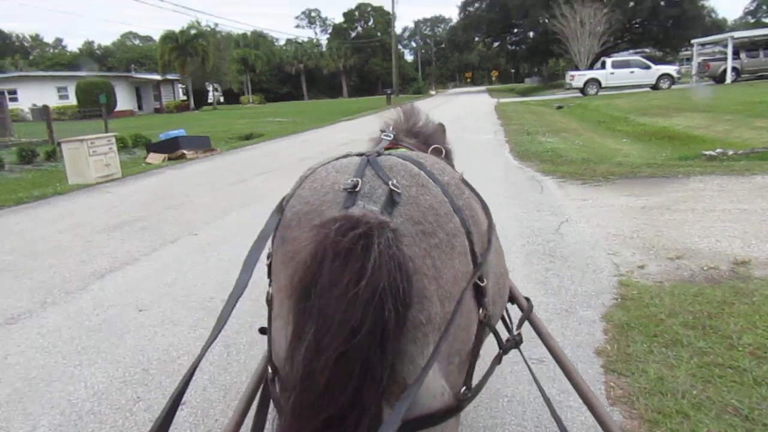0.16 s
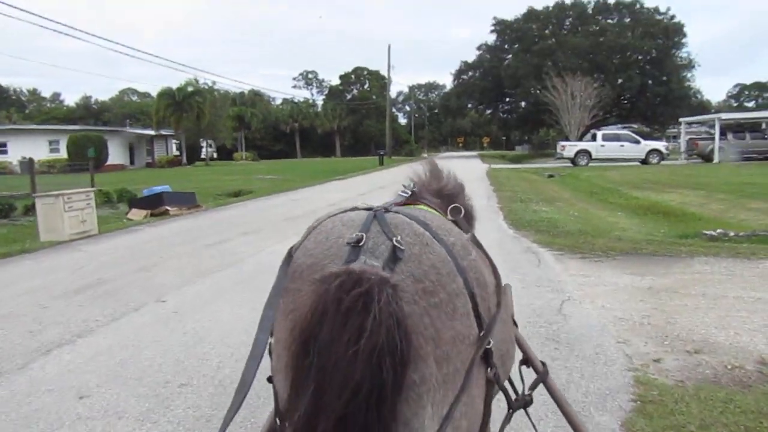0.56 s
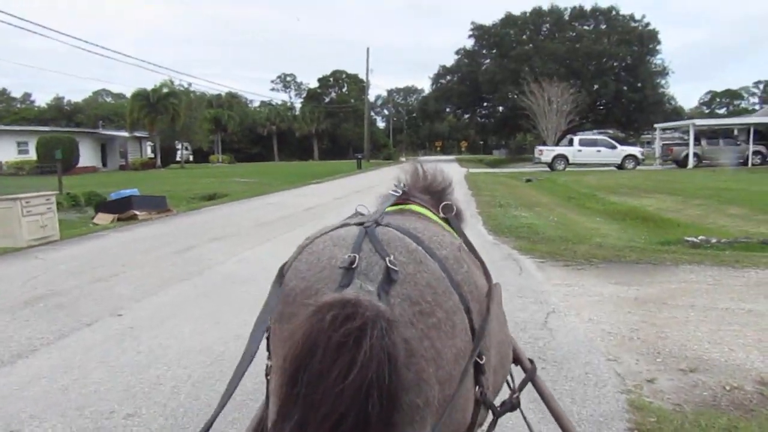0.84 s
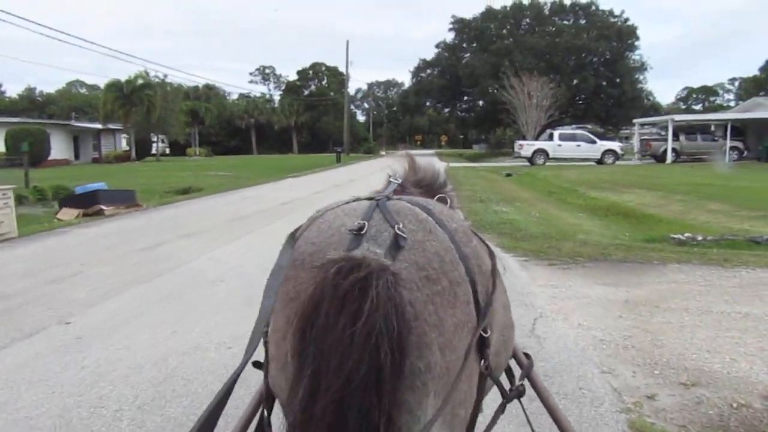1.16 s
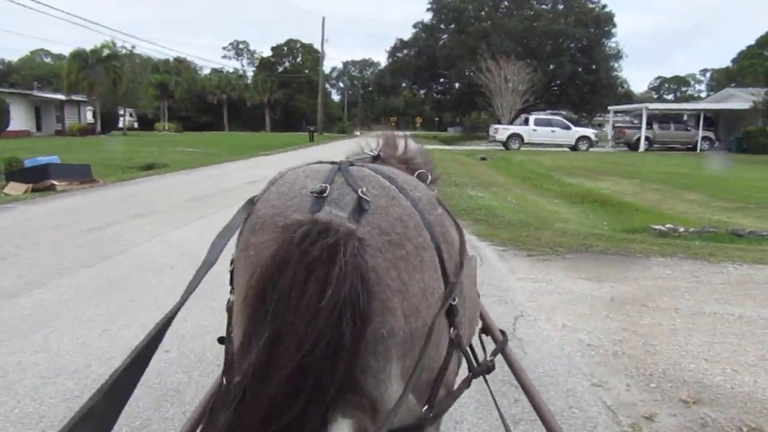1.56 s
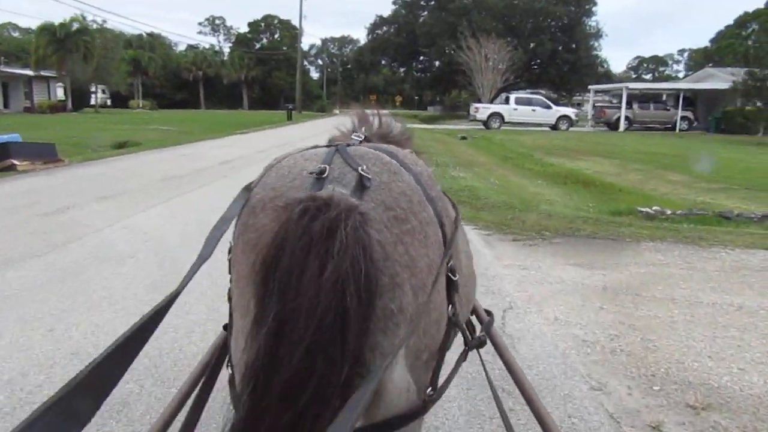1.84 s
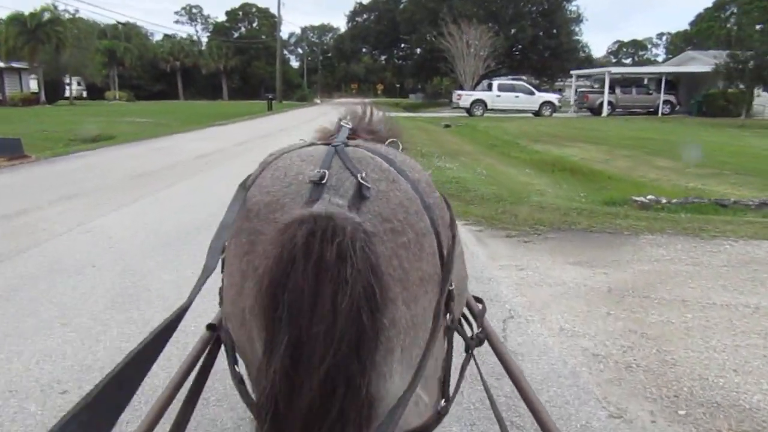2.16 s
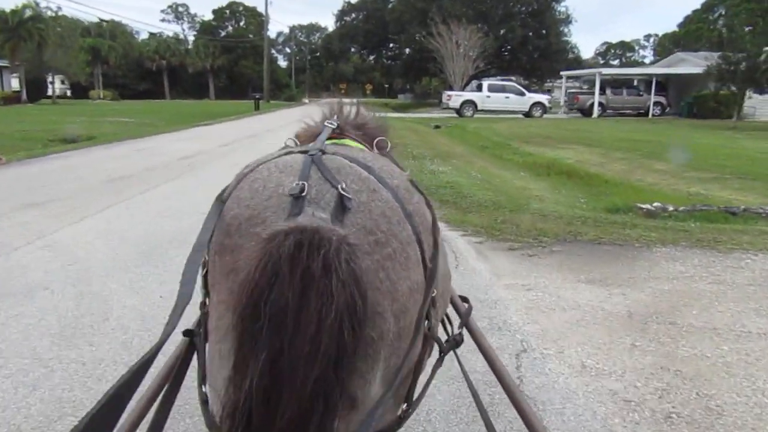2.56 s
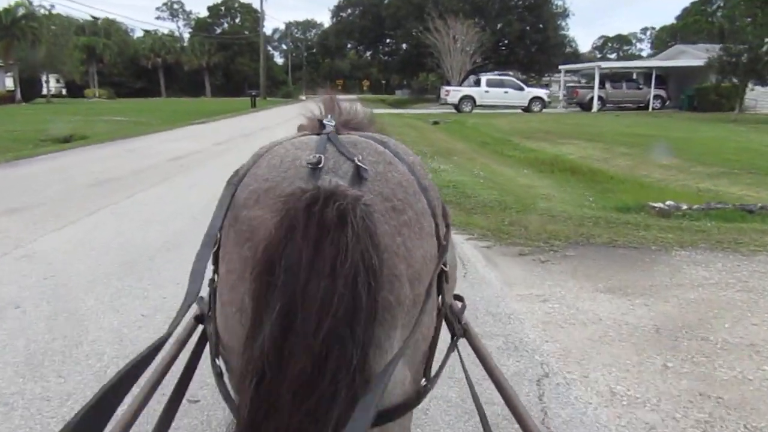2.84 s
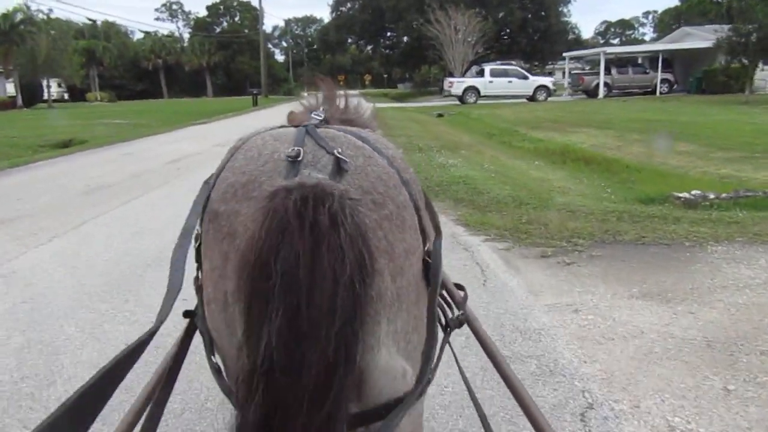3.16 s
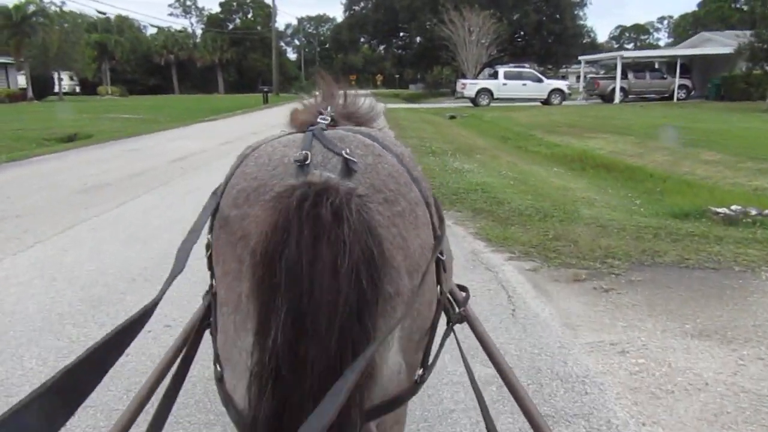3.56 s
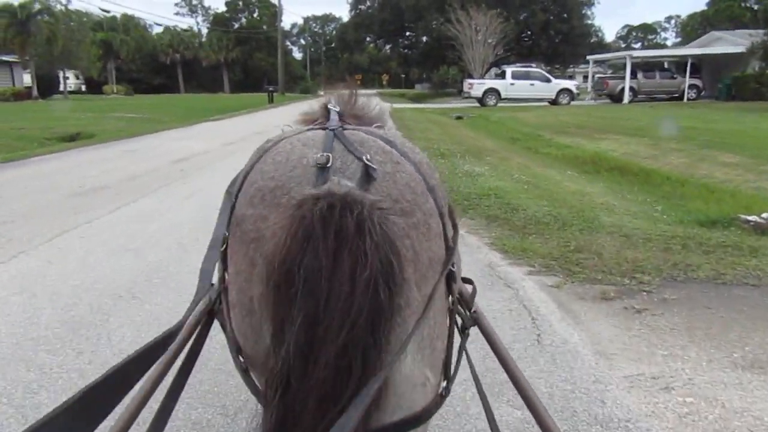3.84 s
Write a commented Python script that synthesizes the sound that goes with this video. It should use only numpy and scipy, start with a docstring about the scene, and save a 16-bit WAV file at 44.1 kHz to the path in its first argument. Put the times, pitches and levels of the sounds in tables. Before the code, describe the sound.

Wind starts buffeting the microphone at about 0.3 seconds and continues in quick, low, uneven puffs until 4 seconds. The pony cart gives one briefly ringing clunk near 0.5 seconds. The hardest wind slap lands at 1.2 seconds, making the level dip briefly. Underneath are faint hoof scuffs around 0.9, 1.7, 2.6 and 3.5 seconds, scattered harness ticks, soft tyre noise and a thin, insect-like hiss.

```python
"""Pony cart in the wind

A pony cart rolls along a quiet road while wind buffets the camera's microphone in short puffs, each a
cluster of eddies. Underneath sit faint hoof scuffs, harness ticks, one ringing clunk of the frame, tyre
noise and a high hiss, probably insects. The sound opens after a quarter second, and the hardest slap
of wind makes the gain control duck."""
import sys
import numpy as np
from scipy import signal
from scipy.fft import rfft, irfft
from scipy.io import wavfile
from scipy.ndimage import uniform_filter1d, minimum_filter1d, map_coordinates

SR = 44100
rng = np.random.default_rng(int(sys.argv[2]) if len(sys.argv) > 2 else 0)


def persist_wave(psi):
    """Save psi, clipped to +-1, as 16-bit WAV."""
    counts = np.round(np.clip(psi, -1, 1) * 32767).astype(np.int16)
    wavfile.write(sys.argv[1], SR, np.atleast_2d(counts).T)


N = 176400

# the camera's whine: f/Hz, level/dB
WHINE_TONES = [(11763, -80.5), (11795, -85), (11822, -78.5)]
# colours of the noise layers: f/Hz, relative level/dB
LOW_HISS_SPECTRUM = [(2000, -30), (3200, -13.5), (4000, -4.5), (4500, -6.5), (5300, 0.5), (6000, -2),
                     (7000, -11), (9000, -19), (12000, -27.5), (15000, -36.5)]
HIGH_HISS_SPECTRUM = [(4000, -26), (5800, -13), (6800, 1.5), (7500, -1), (8400, -5), (9200, -10.5),
                      (12000, -15), (15000, -28)]
TYRE_SPECTRUM = [(100, -6), (300, -1.5), (600, -4.5), (1000, -4.5), (1600, -12), (2500, -19), (4000, -21),
                 (8000, -38)]
HOOF_SPECTRUM = [(300, -12), (700, -1), (1300, 2), (1800, -2), (2400, -21), (4000, -20), (8000, -40)]
CRACK_SPECTRUM = [(300, -0.5), (550, 2), (780, -3), (1000, -2), (1600, -3.5), (2500, -10), (3700, -12),
                  (4400, -31), (8000, -47)]
RUMBLE_SPECTRUM = [(12, -13), (25, -20), (55, -3), (95, 0), (140, -2.5), (220, -25), (500, -82)]
# fader curves of the two hiss bands: t/s, level/dB
LOW_HISS_FADER = [(.26, -52.5), (.55, -51.5), (1.17, -54.5), (1.5, -55), (2, -57.5), (3.3, -56.5),
                  (3.8, -59), (4, -61)]
HIGH_HISS_FADER = [(.26, -57.5), (.6, -58), (1.15, -59.5), (1.35, -57.5), (1.95, -60.5), (2.4, -58.5),
                   (2.95, -60.5), (3.2, -56), (3.5, -61), (4, -65)]
# harness ticks: t/s, level/dB, f/Hz, t60/s
HARNESS_TICKS = [(0.419, -39.5, 3350, 0.039), (.803, -57, 11500, .05), (1.098, -54, 9100, .04),
                 (1.31, -43, 2500, .04), (1.844, -48.5, 2200, .04), (2.176, -48, 3300, .05),
                 (2.397, -47, 3000, .03), (2.478, -45.5, 3500, 0.031), (2.708, -46, 3520, .03),
                 (2.814, -48, 2500, .04), (3.027, -46, 3000, .08), (3.055, -57, 9300, .2),
                 (3.35, -49, 4500, .04), (3.46, -51, 3500, .04), (3.562, -46, 3500, .03),
                 (3.895, -50, 3300, .04), (3.918, -50, 2700, 0.055)]
# hoof scuffs: t/s, level/dB
HOOF_SCUFFS = [(.865, -40.5), (1.69, -40), (1.755, -44), (2.615, -40), (3.459, -35), (3.481, -43.5)]
# modes of the cart's frame: f/Hz, relative level/dB, t60/s
FRAME_MODES = [(255.4, 7, 0.14), (469, 2, 0.17), (690, -14, .08), (885, -10, 0.088), (972, -0.5, 0.098),
               (1147, -17, 0.19), (1550, -11, 0.08), (1701, -21.5, 0.28), (2220, -29, .065),
               (2620, -24, .06), (3090, -21, 0.12), (3550, -17, 0.044)]
# fader curves of the deep rumble and the airflow between puffs: t/s, relative level/dB
RUMBLE_FADER = [(0.26, -41), (0.36, -32), (0.53, -22), (0.64, -58), (0.79, -28.5), (1.7, -30.5),
                (1.73, -31), (1.97, -26), (2.1, -36.5), (2.2, -26), (2.52, -41), (2.56, -30.5), (3.03, -29),
                (3.06, -21), (3.33, -39.5), (3.78, -21.5), (3.96, -45), (3.98, -19.5)]
FLOW_FADER = [(.26, -23.5), (.4, -27), (.56, -24), (.72, -33.5), (.82, -30), (.94, -26.5), (1.17, -21),
              (1.26, -28), (1.41, -30), (1.55, -24.5), (1.72, -26), (2.1, -22.5), (2.37, -30.5),
              (2.425, -24.5), (2.47, -30.5), (2.66, -23), (2.93, -29), (3.16, -25), (3.4, -34.5),
              (3.54, -27), (3.63, -25.5), (3.74, -25), (3.98, -24.5)]
# stalls in the airflow: t/s
LULL_TIMES = [1.571, 1.72, 1.876, 1.963, 2.264, 2.305, 2.525, 2.905, 3.31, 3.63, 3.742, 3.835]
# puffs of wind: t/s, length/s, relative level/dB, eddy f/Hz
WIND_PUFFS = [(0.261, 0.011, -19, 326), (0.28, 0.027, -29, 390), (0.371, 0.012, -14.5, 231),
              (0.414, 0.017, -20.5, 270), (0.485, 0.017, -26.5, 230), (0.531, 0.011, -16.5, 410),
              (0.563, 0.011, -19, 288), (0.853, 0.012, -24, 330), (0.892, 0.034, -20.5, 278),
              (0.972, 0.032, -13, 256), (1.01, 0.016, -19, 360), (1.04, 0.035, -27.5, 354),
              (1.085, 0.021, -25.5, 338), (1.111, 0.01, -13.5, 320), (1.142, 0.023, -17.5, 240),
              (1.195, 0.012, -15, 323), (1.328, 0.023, -16.5, 300), (1.443, 0.016, -13, 261),
              (1.46, 0.015, -21, 293), (1.499, 0.021, -13, 166), (1.605, 0.011, -19, 235),
              (1.642, 0.012, -16, 248), (1.675, 0.019, -20, 200), (1.802, 0.028, -18.5, 221),
              (1.844, 0.016, -18.5, 380), (1.921, 0.028, -16.5, 317), (1.949, 0.009, -25, 195),
              (1.981, 0.011, -16.5, 230), (2.017, 0.0098, -11.5, 190), (2.057, 0.0097, -13, 305),
              (2.074, 0.016, -13, 294), (2.116, 0.015, -16, 260), (2.133, 0.012, -10.5, 284),
              (2.167, 0.017, -23, 250), (2.196, 0.01, -22, 262), (2.222, 0.01217, -19, 190),
              (2.246, 0.021, -24.5, 296), (2.278, 0.016, -14.5, 278), (2.343, 0.013, -15.5, 236),
              (2.501, 0.014, -22.5, 180), (2.557, 0.0094, -14, 251), (2.572, 0.012, -13.5, 295),
              (2.605, 0.009, -20.5, 247), (2.631, 0.017, -20, 210), (2.704, 0.014, -15, 225),
              (2.746, 0.013, -20, 186), (2.783, 0.011, -17, 223), (2.85, 0.0095, -17, 239),
              (3.032, 0.02, -19.5, 272), (3.056, 0.014, -25, 224), (3.103, 0.017, -16.5, 324),
              (3.129, 0.018, -13.5, 290), (3.156, 0.016, -20, 294), (3.185, 0.0085, -17.5, 258),
              (3.215, 0.025, -13.5, 310), (3.34, 0.0096, -19.5, 165), (3.465, 0.025, -22.5, 195),
              (3.519, 0.015, -14, 302), (3.544, 0.012, -14.5, 322), (3.562, 0.013, -18, 288),
              (3.589, 0.015, -16.5, 253), (3.681, 0.0093, -15.5, 290), (3.719, 0.015, -12.5, 226),
              (3.764, 0.012, -17.5, 254), (3.782, 0.011, -14, 360), (3.844, 0.011, -16.5, 215),
              (3.89, 0.022, -18.5, 272), (3.912, 0.012, -18.5, 320), (3.956, 0.021, -24.5, 255)]
# single hard eddies: t/s, level/dB, f/Hz
WIND_SLAPS = [(0.3749, -13, 316), (0.5311, -7.5, 430), (1.111, -4, 320), (1.1961, 6.5, 268),
              (1.4425, -8, 280), (1.843, -11.5, 385), (2.0747, -5.5, 290), (2.132, -11, 280),
              (2.2744, -4.5, 241), (2.2795, -6.5, 420), (2.5579, -4, 222), (2.572, -7, 270),
              (3.1287, -6.5, 282), (3.211, -6, 396), (3.542, -7, 333), (3.681, -7.5, 300),
              (3.7838, -3, 393)]

EDDIES_PER_S, EDDY_LOG_PITCH_SPREAD, EDDY_SCATTER_DB = 300, 0.27, 4.5


def amp(db):
    return 10 ** (np.asarray(db) / 20)


def unit(x):
    return x / np.sqrt(np.mean(x ** 2) + 1e-20)


def clock():
    return np.arange(N) / SR


def curve(rows):
    """Straight lines through (t/s, value) points."""
    return np.interp(clock(), *np.transpose(rows))


def wobble(knots_per_s):
    """A smooth random drift."""
    return map_coordinates(rng.standard_normal(2000), [clock() * knots_per_s], mode="wrap")


def noise(spectrum, ripple_db=0):
    """Coloured noise of rms 1; ripple adds narrow, steady peaks."""
    f, db = np.transpose(spectrum)
    hz = np.fft.rfftfreq(N, 1 / SR)
    ripple = np.interp(hz, np.linspace(0, SR / 2, 2200), rng.standard_normal(2200))
    shape_db = np.interp(np.log(hz + 1), np.log(f), db) + ripple_db * ripple
    return unit(irfft(rfft(rng.standard_normal(N)) * amp(shape_db), N))


def tone(hz):
    """A sine of random phase."""
    return np.sin(2 * np.pi * (hz * clock() + rng.random()))


def strike(start, attack_s, t60):
    """A percussive envelope: quick rise, exponential tail."""
    age = np.maximum(clock() - start, 0)
    return (1 - np.exp(-age / attack_s)) * amp(-60 * age / t60)


def camera_whine():
    """Three faint, close tones beat against each other."""
    return sum(amp(db) * np.sqrt(2) * tone(hz) for hz, db in WHINE_TONES)


def hiss():
    """Two bands of high hiss full of faint steady pitches, probably insects in the verges."""
    low = amp(curve(LOW_HISS_FADER)) * noise(LOW_HISS_SPECTRUM, ripple_db=4.0)
    high = amp(curve(HIGH_HISS_FADER)) * noise(HIGH_HISS_SPECTRUM, ripple_db=5.0)
    return low + high


def tyres(level_db=-48.5, flutter_db=1.07):
    """Rolling tyres lay down a soft, slightly fluttering bed of noise."""
    return amp(level_db + flutter_db * wobble(25)) * noise(TYRE_SPECTRUM)


def harness():
    """The harness ticks: tiny noise bursts, each peaking at its own pitch."""
    out = np.zeros(N)
    for start, db, hz, t60 in HARNESS_TICKS:
        colour = [(hz / 4, -16), (hz, 0), (hz * 1.25, -8), (hz * 3, -25)]
        out += amp(db) * strike(start, 0.00086, t60) * noise(colour)
    return out


def hooves():
    """Hooves scuff the asphalt in short bursts of midrange noise."""
    envelope = sum(amp(db) * strike(start, attack_s=.002, t60=0.1) for start, db in HOOF_SCUFFS)
    return envelope * noise(HOOF_SPECTRUM)


def cart_clunk(at_s=.5475, gain_db=-22.5):
    """The frame clunks once: a noisy crack over its ringing modes."""
    ring = sum(amp(db) * strike(at_s, 0.00087, t60) * tone(hz) for hz, db, t60 in FRAME_MODES)
    crack = amp(-4.5) * strike(at_s, attack_s=0.0016, t60=0.097) * noise(CRACK_SPECTRUM)
    return amp(gain_db) * (ring + crack)


def eddies(times, sizes, hz, skew):
    """Each eddy passing the microphone port is one swing of pressure; skew makes it lopsided."""
    index = np.round(times * SR).astype(int)[:, None] + np.arange(-500, 501)
    u = np.pi * np.maximum(hz, 95)[:, None] * (index / SR - times[:, None])  # time scaled by pitch
    even = np.cos(skew)[:, None] * (1 - 2 * u ** 2)
    odd = np.sin(skew)[:, None] * u * (2 - u ** 2)
    swing = (even + odd) * np.exp(-u ** 2)
    inside = (index >= 0) & (index < N)
    return np.bincount(index[inside], (sizes[:, None] * swing)[inside], minlength=N)


def turbulence(start, end, pitch_at):
    """A train of eddies of random size, scattered around a pitch that may move."""
    count = int((end - start) * EDDIES_PER_S) + 2
    jitter, size, pitch, skew = np.random.default_rng(rng.integers(2 ** 31)).random((count, 4)).T
    spread = lambda u: (2 * u - 1) * np.sqrt(3)  # zero mean, unit variance
    times = start + (np.arange(count) + jitter) / EDDIES_PER_S
    sizes = amp(EDDY_SCATTER_DB * spread(size))
    hz = pitch_at(times) * np.exp(EDDY_LOG_PITCH_SPREAD * spread(pitch))
    return eddies(times, sizes, hz, 2 * np.pi * skew)


def airflow(centre_hz=200, octaves_per_db=0.118, lull_db=-21.5, lull_s=0.012):
    """Lumpy flow and deep rumble stall now and then; faster air makes smaller, higher eddies."""
    t, flow_db = clock(), curve(FLOW_FADER)
    lulls = sum(np.exp(-((t - at) / lull_s) ** 2) for at in LULL_TIMES)
    lumps_db = 2.7 * wobble(36) + lull_db * lulls
    hz = centre_hz * 2 ** (octaves_per_db * (flow_db - flow_db.mean()))
    churn = unit(turbulence(0, N / SR, lambda times: np.interp(times, t, hz)))
    flow = amp(flow_db - 2.5 + lumps_db) * churn
    rumble = amp(curve(RUMBLE_FADER) + 0.5 + 0.72 * lumps_db) * noise(RUMBLE_SPECTRUM)
    return flow + rumble


def wind_puffs(trim_db=-.8, fall_over_rise=1.14):
    """Each puff is a short swell of eddies that falls a little slower than it rises."""
    out, t = np.zeros(N), clock()
    for centre, length, db, hz in WIND_PUFFS:
        near = abs(t - centre) < 2 * length
        u = (t[near] - centre) / length
        swell = np.exp(-3.1 * np.where(u > 0, u / fall_over_rise, u) ** 2)
        puff = swell * turbulence(centre - 2 * length, centre + 2 * length, lambda times: hz)[near]
        normalise = np.sqrt(0.97 * length * SR / np.sum(puff ** 2))
        out[near] += amp(db + trim_db) * puff * normalise
    return out


def wind_slaps():
    """Single hard eddies smack the microphone."""
    times, db, hz = np.transpose(WIND_SLAPS)
    return eddies(times, amp(db), hz, skew=np.full(len(times), .25))


def scene():
    """The mono mix: wind up front, cart, pony and hiss behind."""
    wind = airflow() + wind_puffs() + wind_slaps()
    return (wind + hiss() + tyres() + cart_clunk() + hooves() + harness() + camera_whine())[None]


def record(dry, threshold_db=.7, attack_s=0.00038, recover_db_per_s=8.5, start_s=.25):
    """The gain ducks fast on overload and recovers slowly; the camera clips the peak and trims the top."""
    t = clock()
    over_db = np.maximum(20 * np.log10(abs(dry[0]) + 1e-9) - threshold_db, 0)
    duck_db = np.maximum.accumulate(over_db + recover_db_per_s * t) - recover_db_per_s * t
    span = 2 * int(attack_s * SR) + 1
    held_db = -minimum_filter1d(-duck_db, span)
    gain = amp(-uniform_filter1d(held_db, span))
    fade_in = np.clip((t - start_s) / 0.0018, 0, 1)
    clipped = np.clip(dry * gain, -1, 1) * fade_in
    notch = signal.iirnotch(7870, Q=50, fs=SR)  # a narrow gap in the camera's response
    high_cut = signal.ellip(12, .1, 90, 15000, fs=SR, output="sos")
    return signal.sosfilt(high_cut, signal.lfilter(*notch, clipped))


dry = scene()
out = record(dry)
persist_wave(out)
```